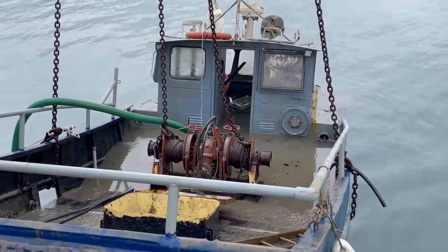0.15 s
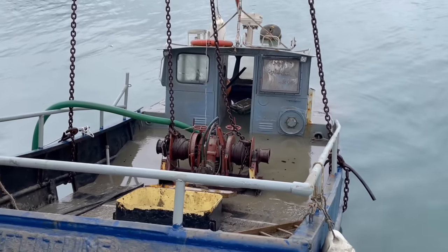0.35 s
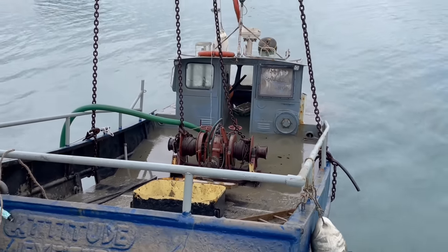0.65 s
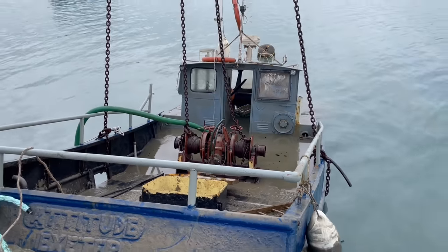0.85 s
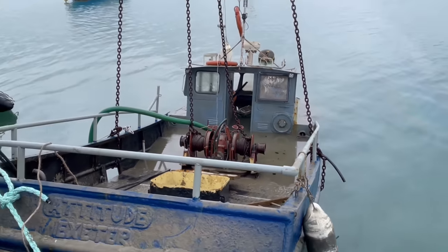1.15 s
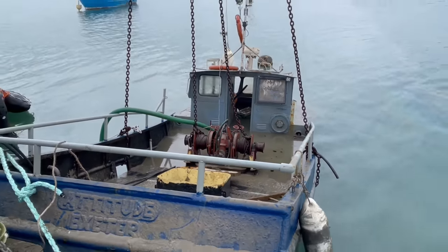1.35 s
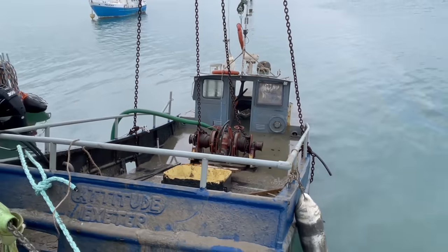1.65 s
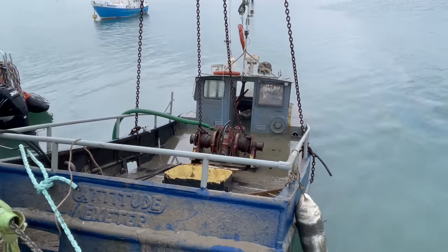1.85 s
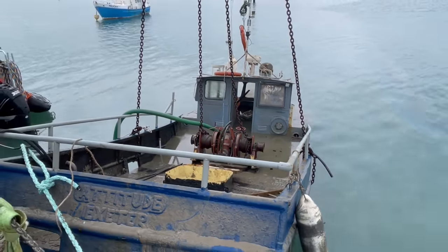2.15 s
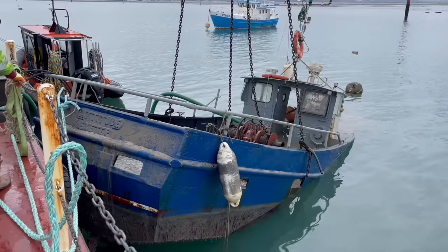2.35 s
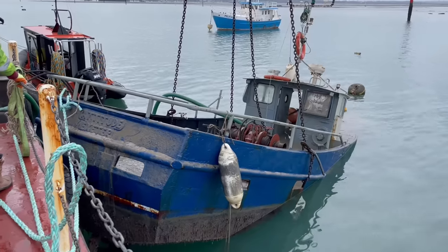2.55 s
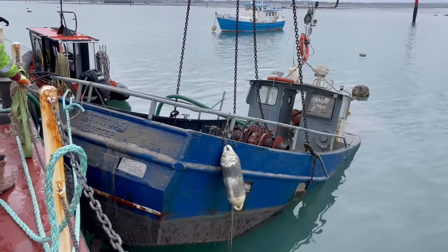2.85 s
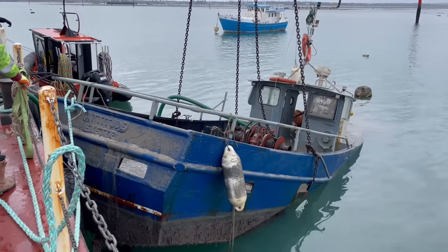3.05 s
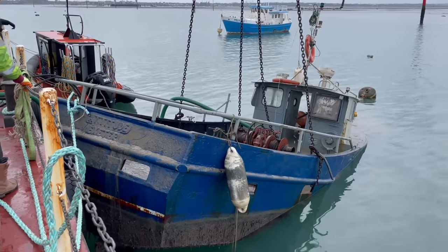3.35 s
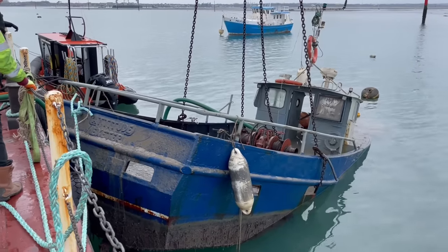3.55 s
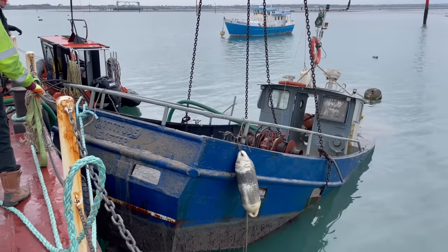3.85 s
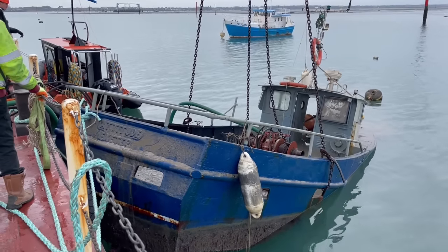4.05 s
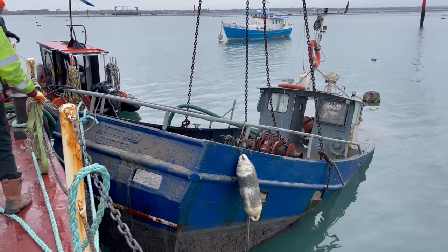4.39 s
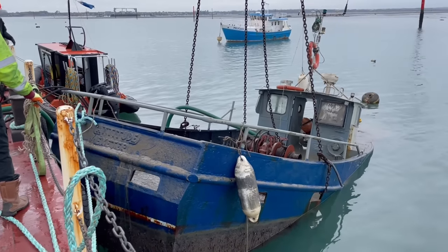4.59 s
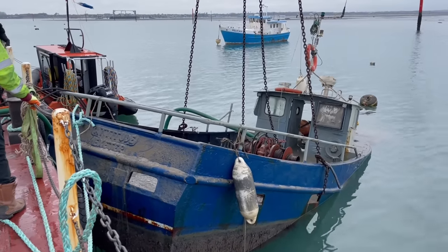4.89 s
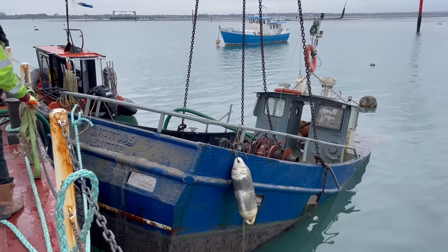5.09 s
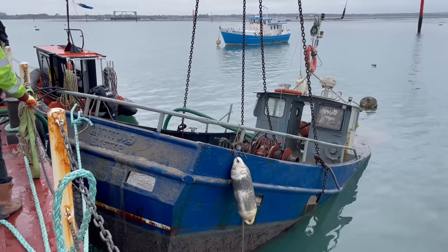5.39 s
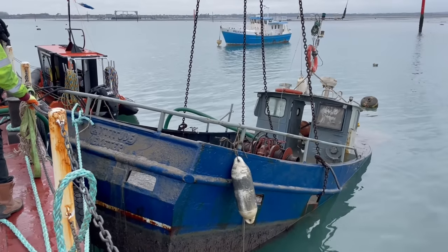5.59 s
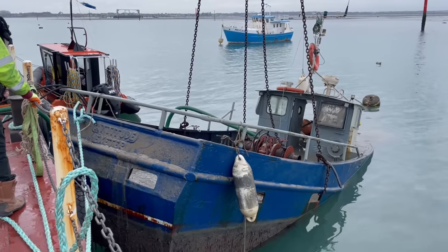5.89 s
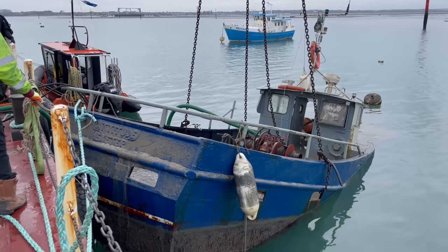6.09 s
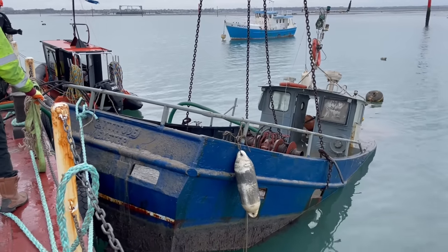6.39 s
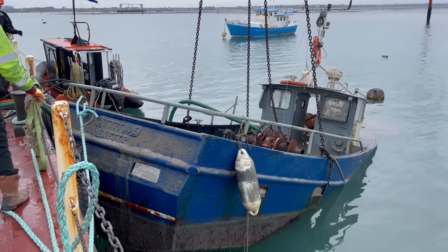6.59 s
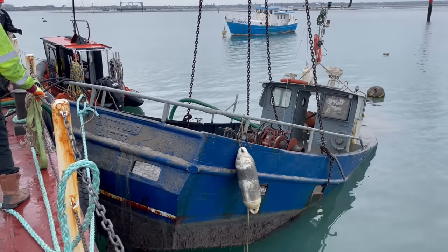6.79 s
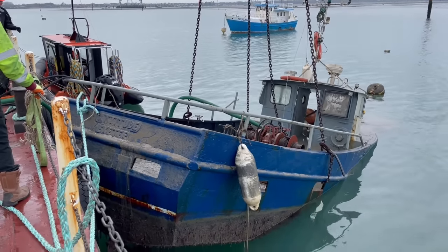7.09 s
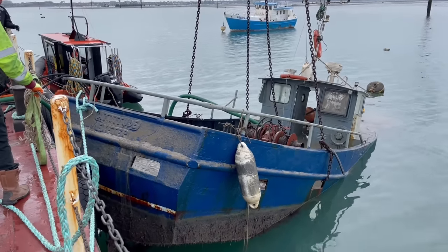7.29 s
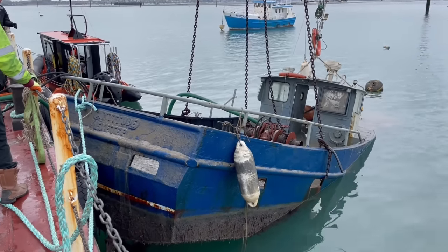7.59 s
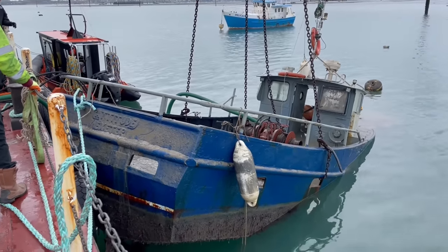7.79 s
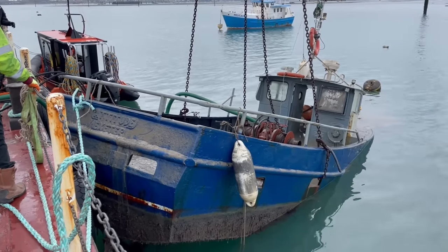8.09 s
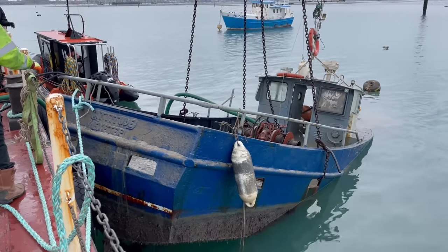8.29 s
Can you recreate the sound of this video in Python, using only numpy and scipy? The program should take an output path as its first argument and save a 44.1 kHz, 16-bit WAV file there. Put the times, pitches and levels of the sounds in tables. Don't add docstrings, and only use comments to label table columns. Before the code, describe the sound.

Outdoors on a barge, a little engine drones at constant speed, its fast lumpy exhaust beat mixed with rattling casing, fine hiss and a faint high gear whine. After about two seconds the sound dips abruptly and resumes from a second position, marginally lower in pitch. Bassy gusts buffet the exposed handheld stereo microphone, with sharp wind pops, busiest near the middle and again towards the end.

```python
import sys
import numpy as np
from scipy import signal
from scipy.fft import rfft, irfft
from scipy.io import wavfile
from scipy.ndimage import uniform_filter1d

SR = 44100
rng = np.random.default_rng(int(sys.argv[2]) if len(sys.argv) > 2 else 0)


def boost(x):
    u = np.asarray(x, float) / 20
    return 10 ** u


def dump(signal):
    limited = np.clip(np.atleast_2d(signal).T, -1, 1)
    pcm = np.round(limited * 32767).astype(np.int16)
    wavfile.write(sys.argv[1], SR, pcm)


N = 372204
CUT_S = 2.3225


def evened(x):
    return x / np.sqrt(np.mean(x ** 2) + 1e-20)


def read(points, hz):
    table_hz, *columns = np.transpose(points)
    return np.array([np.interp(np.log(hz + 1), np.log(table_hz + 1), column) for column in columns])


def drift(top_hz):
    spectrum = rfft(rng.standard_normal(N))
    return evened(irfft(spectrum / (1 + (np.fft.rfftfreq(N, 1 / SR) / top_hz) ** 2), N))


def white(size):
    noise = rng.standard_normal((2, N)) * np.sqrt(SR / 2)
    return signal.stft(noise, SR, nperseg=size, noverlap=size * 3 // 4)


def left_right(mid, side, size):
    both = np.array([mid + side, mid - side])
    return signal.istft(both, SR, nperseg=size, noverlap=size * 3 // 4)[1][:, :N]


# time in seconds, engine cycles per second.
SPEED = [
    [(.34, 23.238), (.89, 23.262), (1.43, 23.209), (1.98, 23.189)],
    [(2.62, 22.891), (3.05, 22.791), (3.47, 22.816), (3.9, 22.81), (4.32, 22.744), (4.74, 22.807),
     (5.17, 22.853), (5.59, 22.837), (6.02, 22.747), (6.44, 22.757), (6.86, 22.775), (7.29, 22.794),
     (7.71, 22.769), (8.14, 22.806)],
]
FIRST_PULSE = [.453, .85]


def cycles():
    t = np.arange(N) / SR
    first, second = (np.interp(t, *np.transpose(rows)) for rows in SPEED)
    speed = np.where(t < CUT_S, first, second)
    return np.cumsum(speed) / SR + np.where(t < CUT_S, *FIRST_PULSE) + .0008 * drift(4)


# multiple of the cycle rate, level in dB.
EXHAUST_DB = [
    [(2, -73), (3, -64), (4, -97), (5, -64), (6, -63), (7, -69), (8, -58), (9, -65), (10, -57), (11, -62),
     (12, -78), (13, -63), (14, -65), (15, -67)],
    [(2, -97), (3, -97), (4, -70), (5, -66), (6, -61), (7, -60), (8, -52), (9, -63), (10, -57), (11, -55),
     (12, -77), (13, -60), (14, -62), (15, -59)],
]
# multiple of the cycle rate, level in dB.
FRAME_DB = [
    [(16, -75), (20, -77), (21, -80), (22, -74), (23, -79), (24, -64), (25, -75), (26, -80), (31, -81),
     (32, -80), (38, -79), (39, -79), (40, -81), (41, -81)],
    [(16, -75), (17, -75), (18, -75), (19, -77), (21, -74), (24, -64), (26, -77), (32, -73), (38, -76),
     (40, -79), (41, -78), (42, -80), (44, -80), (54, -82)],
]


def tones_db(place):
    faint_db, scatter_db, top_multiple = (-86, -84.5), 2.5, 54
    db = faint_db[place] + scatter_db * rng.standard_normal(top_multiple)
    for k, tone_db in EXHAUST_DB[place] + FRAME_DB[place]:
        db[k - 1] = tone_db
    return np.arange(1, top_multiple + 1), db


# time as a share of the cycle, size in dB.
FIRING = [
    [(0, 0), (.333, .75), (.572, -5.9)],
    [(0, 0), (.335, -2.3), (.8, -8.1)],
]
# centre in Hz, width in Hz, phase glide in radians at 300 Hz.
MUFFLER = [
    (110, 48, 1.26),
    (146, 59, 2.41),
]


def exhaust(turns, unlike_db=-22, lag_s=0.00029, shade_db=10):
    knock_share, looseness = (.56, .63), .7
    grid = np.arange(2048) / 2048
    late = np.arange(N) >= CUT_S * SR
    out = np.zeros((2, N))
    changes = [boost(unlike_db) / 2 * drift(3) for _ in range(3)]
    for place in (0, 1):
        k, db = tones_db(place)
        hz = k * SPEED[place][0][1]
        here = late == place
        pulses = sum(boost(size_db) * np.exp(-2j * np.pi * k * share) for share, size_db in FIRING[place])
        centre_hz, width_hz, glide = MUFFLER[place]
        ring = 1j * hz / (centre_hz ** 2 - hz ** 2 + 1j * hz * width_hz)
        phase = np.angle(pulses * ring) + glide * (hz / 300) ** 2
        left = np.sqrt(2) * boost(db) * np.exp(1j * phase)
        knock = np.exp(2j * np.pi * (looseness * rng.random(len(k)) - k * knock_share[place]))
        left = np.where(k > 24, abs(left) * knock, left)
        shadow_db = -2 * (1 - place) - shade_db * (hz / 1000) ** 1.3
        right = left * boost(shadow_db) * np.exp(-2j * np.pi * hz * lag_s)
        tones = np.exp(2j * np.pi * np.outer(k, grid))
        layers = [(np.ones(N), 1)]
        for change in changes:
            chance_phase = np.exp(2j * np.pi * rng.random(len(k)))
            layers.append((change, np.maximum(hz / 280, 1) * chance_phase))
        for weight, twist in layers:
            for port, tone in enumerate((left, right)):
                one_cycle = ((tone * twist) @ tones).real
                out[port, here] += weight[here] * np.interp(turns[here], grid, one_cycle, period=1)
    return out


WHINE_DB = [-92, -81.5]


def whine(turns):
    level_db = np.where(np.arange(N) < CUT_S * SR, *WHINE_DB) + 1.2 * drift(2)
    surge = np.sin(2 * np.pi * turns)
    tone = (1 + .25 * surge) * np.cos(2 * np.pi * 96 * turns + .95 * surge)
    return np.sqrt(2) * boost(level_db) * tone * boost(1) ** 0 * np.array(boost([[1], [-1]]))


# time in seconds, centre in Hz, peak in dB.
SLIDING = [(0, 3900, 3), (2.3, 3900, 3), (2.35, 4220, 4), (3.6, 4220, 4), (4.1, 3850, 2), (5.5, 3700, 3),
           (7.3, 3700, 3), (8.44, 3800, 1)]
# centre in Hz, width in Hz, peak in dB.
SHROUD = (5340, 80, 5)


def rings(hz, t):
    s, centre_hz, peak_db = np.transpose(SLIDING)
    sliding_db = np.interp(t, s, peak_db) * np.exp(-((hz - np.interp(t, s, centre_hz)) / 170) ** 2)
    shroud_hz, width_hz, shroud_db = SHROUD
    return boost(sliding_db + (t > CUT_S) * shroud_db * np.exp(-((hz - shroud_hz) / width_hz) ** 2))


# low edge in Hz, high edge in Hz.
MID_GAP = [
    (8260, 9000),
    (7560, 8960),
]


def engine_noise(tables, edge, patchy_db, flicker_gain):
    side_top_hz = 12750
    hz, t, (a, b) = white(size=1024)
    mid_db, side_db, like, lead = np.where(t < CUT_S, *(read(rows, hz)[..., None] for rows in tables))
    patches = rng.standard_normal(a.shape)
    patches = evened(uniform_filter1d(uniform_filter1d(patches, 10, 0), 12, 1))
    level = edge(hz[:, None], t) * boost(patchy_db * patches)
    like = np.sqrt(np.clip(like, 0, 1))
    low_hz, high_hz = np.where(t < CUT_S, *np.array(MID_GAP)[..., None])
    mid_db = mid_db - 30 * ((hz[:, None] > low_hz) & (hz[:, None] < high_hz))
    side_db = side_db - 40 * (hz[:, None] > side_top_hz)
    side = boost(side_db) * (like * np.exp(1j * lead) * a + np.sqrt(1 - like ** 2) * b)
    return left_right(boost(mid_db) * a * level, side * level, size=1024) * flicker_gain


# frequency in Hz, mid in dB per Hz,
# side in dB per Hz, mid-side likeness from 0 to 1, side lead in radians.
CLATTER_BEFORE = [(270, -73.5, -77, 0.87, 2.1), (433, -92.5, -99, 0.9, 0.13), (670, -104, -100, 0.7, 0.26),
                  (950, -100, -100, 0.81, 1.2), (1210, -104, -104, 0.5, 1.9), (1470, -107, -112, 0.8, 0.86),
                  (1900, -110, -126, 0.8, 0.13), (2240, -104, -125, 0.2, 0.44),
                  (2580, -112, -125, 0.3, 0.056), (2880, -110, -120, 0.7, 1.7), (3710, -110, -119, 0, 1.5),
                  (4250, -116, -127, 0.28, 1.9), (5400, -113, -123, 0.49, 1.7),
                  (5630, -117, -121, 0.4, -1.5)]
CLATTER_AFTER = [(266, -74, -78.5, 0.73, 1.2), (382, -86.5, -100, 0.22, 1), (697, -103, -95, 0.8, 0.6),
                 (1030, -102, -99, 1, -0.9), (1190, -103, -94, 0.7, 0), (1400, -107, -107, 0.3, -0.9),
                 (2140, -109, -111, 0.8, -2), (2090, -103, -112, 0.79, -3.7), (2615, -106, -109, 0.4, 2),
                 (3030, -112, -112, 0.23, 1.2), (4270, -108, -113, 0.99, 1), (4090, -109, -114, 0.4, 2.2),
                 (4890, -112, -112, 0.8, -0.2), (5660, -118, -122, 0.22, -1)]
# frequency in Hz, mid in dB per Hz, side in dB per Hz,
# mid-side likeness from 0 to 1, side lead in radians.
HISS = [
    [(6050, -117, -121, 0.6, -1.1), (6830, -114, -120, 0.31, -1.8), (7200, -119, -117, 0.79, -1.5),
     (7900, -121, -116, 0.64, -2.1), (8540, -124, -116, 0.53, -1.6), (8450, -132, -117, 0.04, 1.2),
     (8900, -129, -116, 0.32, 1.1), (10000, -122, -120, 0.6, 1.3), (12300, -117, -124, 0.45, 1.6),
     (13100, -113, -132, 0.03, 1.6), (14200, -116, -132, 0.01, 1.6), (15700, -125, -132, 0.02, 1.6)],
    [(5550, -118, -122, 0.17, 0.5), (6630, -118, -122, 0.14, -1), (7560, -122, -115, 0.34, -1),
     (7150, -132, -113, 0.9, -4), (8250, -132, -113, 0, -4.5), (9130, -132, -113, 0.77, 2.5),
     (8800, -123, -112, 0.42, 0), (10800, -116, -114, 0.62, 2.2), (12900, -113, -121, 0.81, 1),
     (12500, -112, -132, 0.12, 1), (14300, -115, -132, 0.01, 1.6), (15500, -121, -132, 0.27, 2)],
]
# time in seconds, level in dB.
TURNING = [(0, -0.5), (1, -0.5), (2.3, -1), (2.35, 0.5), (3.5, 0.5), (4.5, 0.5), (5.5, 0), (6.5, 0),
           (7.5, -1), (8.44, 0)]


def casing(turns):
    split_hz = 5550
    shared_db = drift(20) * .5 + np.interp(np.arange(N) / SR, *np.transpose(TURNING))
    beat = np.cos(2 * np.pi * (turns - .45))

    def below(hz, t):
        return (hz < split_hz) / (1 + (330 / (hz + 1)) ** 6) * rings(hz, t)

    def above(hz, t):
        return 1. * (hz >= split_hz)

    clatter = engine_noise((CLATTER_BEFORE, CLATTER_AFTER), below, 1.2, boost(shared_db + 1.1 * beat))
    return clatter + engine_noise(HISS, above, 1.1, boost(0.67 * shared_db + 0.98 * beat))


def swells(rows):
    fall_db = 9.5
    t = np.arange(0, N + 64, 64) / SR
    power = sum(boost(db - fall_db * abs(t - s) / max(half_s, .01)) ** 2 for s, db, half_s in rows)
    return np.interp(np.arange(N) / SR, t, power)


# peak time in seconds, thud in dB, buffet in dB, half length in seconds.
GUSTS = [(.07, -54, -54, .03), (0.228, -56, -53.5, .03), (0.318, -54, -58.5, .08),
         (0.727, -54, -53.5, 0.11), (1.14, -57, -70, .04), (1.76, -49.5, -55, 0.057),
         (2.252, -55, -54, 0.044), (2.364, -61, -47.5, 0.058), (2.5, -50.5, -52, 0.056),
         (2.63, -62, -48, .04), (2.738, -60, -48.5, .05), (2.888, -55, -51, 0.065), (3.48, -56, -56, .08),
         (3.624, -47, -50, 0.041), (3.8, -59, -51, .06), (3.933, -48, -48.5, 0.055),
         (4.14, -49.5, -50, .05), (4.34, -48, -50, 0.053), (4.583, -49.5, -50.5, 0.11),
         (5.15, -54.5, -63, 0.054), (5.678, -52.5, -56, 0.038), (6.604, -58, -51, .05),
         (6.79, -55, -54, 0.042), (6.92, -50, -57, .05), (7.08, -58, -55, .06), (7.358, -48, -48.5, 0.058),
         (7.495, -49.5, -46, 0.068), (7.626, -53, -47.5, .05), (7.82, -50.5, -55.5, 0.044),
         (8.1, -52.5, -53, 0.054)]
# time in seconds, level in dB.
BREEZE = [(0, -63), (1.3, -69.5), (2.1, -64.5), (2.6, -59), (3.3, -59), (4.2, -59), (5, -60.5), (6.4, -59),
          (7.5, -56), (8.44, -64)]
# frequency in Hz, level in dB per Hz.
THUD = [(12, -70.5), (28, -34), (42, -1.5), (60, 11), (95, -1), (125, -14.5), (200, -49), (400, -110)]
BUFFET = [(50, -61), (90, 3.5), (130, 5), (220, 0.5), (330, -4.5), (430, -28.5), (800, -110)]
FLUTTER = [(150, -63), (330, 2), (480, -8.5), (700, -11.5), (1000, -33.5), (1400, -43), (3000, -110)]
GUST_TRIM_DB = (2, 1.26, 1.6)


def wind():
    breeze = boost(np.interp(np.arange(N) / SR, *np.transpose(BREEZE)) + 1.3 * drift(6)) ** 2
    thud = np.sqrt(breeze + swells(np.array(GUSTS)[:, [0, 1, 3]]))
    gusting = swells(np.array(GUSTS)[:, [0, 2, 3]])
    buffet = np.sqrt(breeze * boost(-0.5) ** 2 + gusting)
    bursts = swells([(s, peak_db - 15, 0.034) for s, peak_db, _ in POPS])
    flutter = np.sqrt(bursts + gusting * boost(-13.5) ** 2 + breeze * boost(-15.5) ** 2)
    out = 0
    sides_db, lumps_db = (-10, -5, -4), (1.8, 1.5, 3.)
    layers = zip((THUD, BUFFET, FLUTTER), (thud, buffet, flutter), sides_db, lumps_db, GUST_TRIM_DB)
    for colour, level, side_db, lumpy_db, trim_db in layers:
        hz, _, (a, b) = white(size=2048)
        shape = boost(read(colour, hz)[0])[:, None]
        puffs = evened(left_right(a * shape, boost(side_db) * b * shape, size=2048))
        puffs /= np.sqrt(uniform_filter1d(puffs.mean(0) ** 2, size=3000) + .3)
        out = out + level * boost(trim_db + lumpy_db * drift(40)) * puffs
    return out


# time in seconds, peak in dB, pan in dB to the left.
POPS = [(0.067, -47, 2.5), (0.22, -52, 2.0), (0.716, -48.5, 6), (1.756, -51, 1), (2.248, -49, 3.5),
        (2.518, -43.5, 2.0), (3.579, -45, 5), (3.613, -44, 4.0), (3.82, -49, 2), (3.938, -44, 3.0),
        (4.139, -50, 3), (4.339, -54, 5.5), (4.518, -43, 1.5), (5.672, -46.5, 2.5), (7.239, -47, 0.0),
        (7.344, -42, 1.0), (7.489, -43, 1.0), (7.531, -41.5, 4), (7.604, -39, 6)]


def pops():
    pop_hz, glide_s = 348, 0.01275
    out = np.zeros((2, N + 2000))
    t = np.arange(2000) / SR
    for (s, peak_db, pan_db), chance in zip(POPS, rng.random((len(POPS), 1))):
        turns = 1.596 * pop_hz * 0.01197 * (1 - np.exp(-t / glide_s))
        swing = np.sin(2 * np.pi * (turns + chance[0]))
        swing *= (1 - np.exp(-t / 0.00064)) * np.exp(-t / 0.0077)
        pan = np.clip([[pan_db / 2], [-pan_db / 2]], -4, 4)
        start = round(s * SR)
        out[:, start:start + len(t)] += boost(peak_db + pan) * swing
    return out[:, :N]


def scene():
    turns = cycles()
    return exhaust(turns) + whine(turns) + casing(turns) + wind() + pops()


def roll_off(x):
    return signal.sosfilt(signal.butter(12, 15720, fs=SR, output="sos"), x)


def record(dry):
    bass_cut = signal.butter(2, 33, 'high', fs=SR, output='sos')
    fade = np.clip(abs(np.arange(N) / SR - CUT_S) / .011 - .15, .02, 1)
    return roll_off(signal.sosfilt(bass_cut, dry) * fade)


dry = scene()
out = record(dry)
dump(out)
```